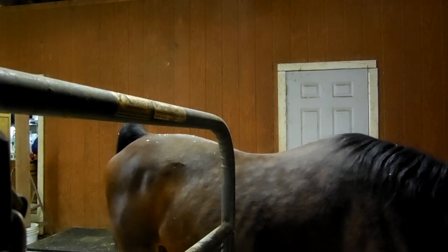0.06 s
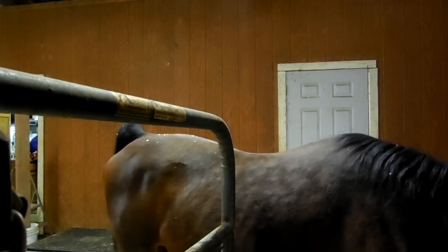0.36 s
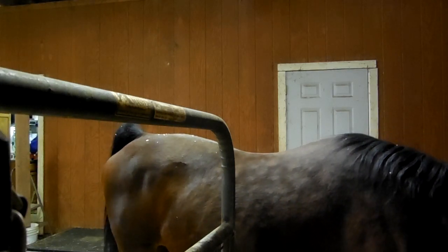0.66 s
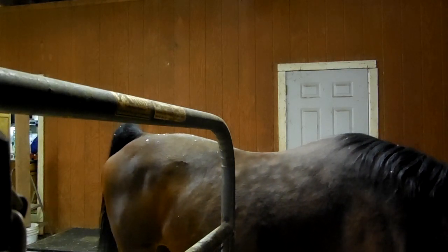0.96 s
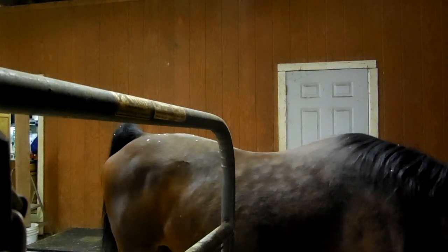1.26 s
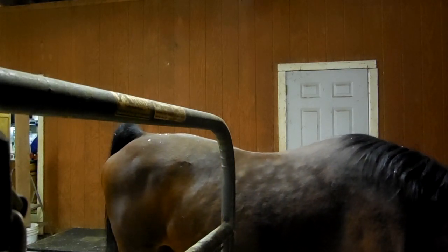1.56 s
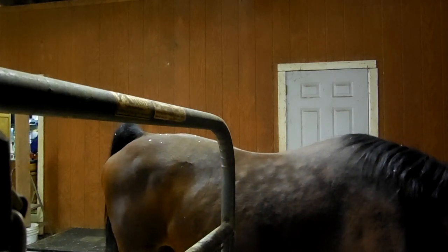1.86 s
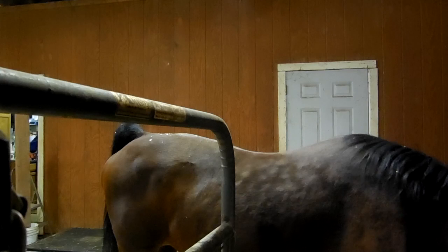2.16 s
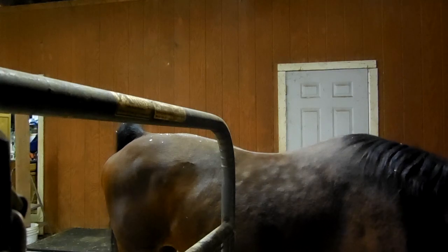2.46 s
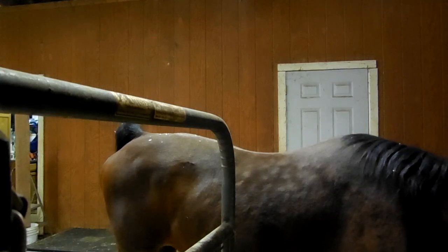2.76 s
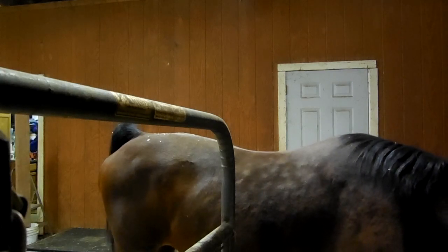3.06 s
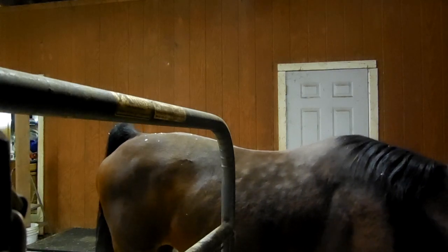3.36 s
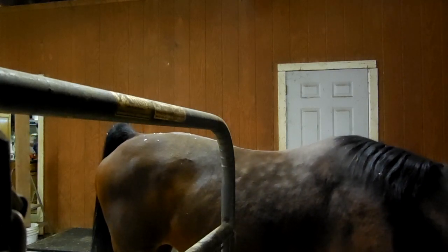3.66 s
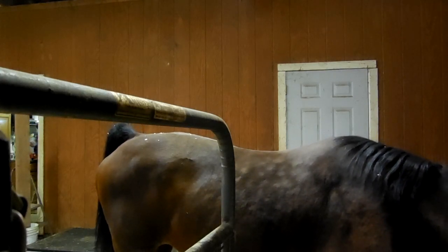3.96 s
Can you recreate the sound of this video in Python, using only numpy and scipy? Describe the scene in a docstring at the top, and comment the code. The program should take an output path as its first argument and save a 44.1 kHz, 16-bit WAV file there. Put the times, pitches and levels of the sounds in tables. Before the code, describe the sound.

Rain hisses steadily on a barn roof over humming fans and a few hoof knocks.

```python
"""In a wooden barn, rain hisses steadily on the roof while two electric motors, probably fans, hum.
Countless drop impacts merge into broadband noise. The two shafts turn at almost the same speed,
so their harmonics beat and the drone slowly swells and sinks. A horse shifts its weight: a few soft
hoof knocks excite the modes of the stall floor, scuffs add friction noise, and the walls reverberate."""
import sys
import numpy as np
from scipy import signal
from scipy.fft import rfft, irfft
from scipy.io import wavfile

SR = 44100
rng = np.random.default_rng(int(sys.argv[2]) if len(sys.argv) > 2 else 0)


def output_pcm(signal):
    """Save a mono or channel-first signal as 16-bit PCM at the path in sys.argv[1].

    Samples are clipped to [-1, 1] before scaling.
    """
    pcm = np.clip(np.atleast_2d(signal).T, -1, 1) * 32767
    wavfile.write(sys.argv[1], SR, np.round(pcm).astype(np.int16))


N = 176400
TIME = np.arange(N) / SR
BINS_HZ = np.maximum(np.arange(N // 2 + 1) * SR / N, 1)


def from_db(db):
    """Amplitude ratio: a factor of ten for every 20 dB."""
    return 10 ** (np.asarray(db) / 20)

def unit_rms(x):
    """Normalisation to unit mean power."""
    return x / np.sqrt(np.mean(x ** 2) + 1e-20)

def over_bins(points, column=1):
    """Interpolation of a table column along logarithmic frequency."""
    table = np.array(points)
    return np.interp(np.log(BINS_HZ), np.log(table[:, 0]), table[:, column])

def swell(curve):
    """Amplitude envelope: the gain of a level curve taken about its mean."""
    t, db = np.transpose(curve)
    return from_db(np.interp(TIME, t, db - db.mean()))

def waver(depth_db, rate_hz):
    """Random amplitude modulation: a gain whose level follows low-passed noise."""
    drift = irfft(rfft(rng.standard_normal(N)) / (1 + (BINS_HZ / rate_hz) ** 2), N)
    return from_db(depth_db * unit_rms(drift))

def decay(age, t60):
    """Exponential damping: 60 dB in t60 seconds."""
    return np.exp(-np.log(1000) * age / t60)

def stereo_spectra(pair):
    """Partial coherence: two independent signals give spectra alike in the bass, apart in the treble."""
    # likeness of left and right: f/Hz, correlation coefficient
    likeness = [(100, .998), (230, .995), (400, 0.75), (600, 0.9), (800, 0.75), (1100, 0.86), (2200, 0.68),
                (2800, 0.54), (4000, 0.091), (5400, -0.017), (6300, -0.34), (7200, 0.066), (10000, 0.089),
                (15000, 0.25)]
    correlation = over_bins(likeness)
    mid, side = rfft(pair)
    return np.sqrt(1 + correlation) * mid + np.sqrt(1 - correlation) * side * [[1], [-1]]

def draught():
    """Turbulence: a faint low rumble, independent on each side."""
    lowpass = signal.butter(3, 75, fs=SR, output="sos")
    return from_db(-70) * unit_rms(signal.sosfilt(lowpass, rng.standard_normal((2, N))))

def barn_reverb(source, t60=0.53, first_echo_s=0.0132, cutoff_hz=12000):
    """Reverberation: reflections from the wooden walls merge into a diffuse, decaying tail."""
    tail = rng.standard_normal((2, N)) * decay(TIME, t60) * (TIME > first_echo_s)
    response = irfft(stereo_spectra(tail) / np.sqrt(np.sum(tail ** 2)) / (1 + 1j * BINS_HZ / cutoff_hz), N)
    return signal.fftconvolve(source[None], response[:, :SR], axes=1)[:, :N]

def rain_hiss(drops_per_s=5000, drop_share=0.33, size_spread_db=3.5, ripple_db=1.2):
    """Shot noise: random drop impacts merge into a hiss that flutters band by band."""
    # spectrum of the rain: f/Hz, left relative level/dB, right relative level/dB
    colour = [(300, -25, -28), (1030, -15.5, -16.5), (1480, -13.5, -14), (2270, -13, -14),
              (3720, -10.5, -10.5), (5200, -11.5, -11), (6000, -9, -10), (6870, -10.5, -4.5),
              (7700, -10, -4), (8310, -10.5, -4), (9450, -7, -16.5), (10620, -11.5, -17.5),
              (12100, -18, -22), (13340, -18.5, -22.5), (13800, -26, -33), (16000, -33, -35)]
    # strength of the rain's treble: t/s, relative level/dB
    strength = [(0.0, -35.5), (0.01, -37.5), (0.26, -38), (0.36, -35), (0.73, -39.5), (0.82, -35.5),
                (0.99, -40), (1.0, -37.5), (2.43, -37.5), (2.46, -35), (2.84, -37.5), (3.33, -37),
                (3.61, -35), (3.7, -38.5), (3.89, -35), (4.0, -38)]
    sizes = from_db(size_spread_db * np.minimum(rng.exponential(1, (2, N)), 5))
    signs = rng.choice([-1, 1], (2, N))
    drops = unit_rms(sizes * signs * (rng.random((2, N)) < drops_per_s / SR))
    wash = np.sqrt(drop_share) * drops + np.sqrt(1 - drop_share) * rng.standard_normal((2, N))
    grid_hz = np.arange(0, SR / 2, 40)  # each side has its own finely uneven colour
    ripple = [np.interp(BINS_HZ, grid_hz, row) for row in rng.normal(0, ripple_db, (2, len(grid_hz)))]
    spectra = stereo_spectra(wash) * from_db(ripple) * from_db([over_bins(colour, 1), over_bins(colour, 2)])
    band = np.floor(2 * np.log2(np.maximum(BINS_HZ / 1100, 1)))  # half octaves above 1100 Hz
    hiss = unit_rms(sum(irfft(spectra * (band == k), N) * waver(depth_db=1.05, rate_hz=12.7)
                        for k in np.unique(band)))
    treble = irfft(rfft(hiss) / (1 + (3500 / BINS_HZ) ** 2), N)
    return from_db(-34.5) * (hiss - treble + swell(strength) * treble)

def rain_rings():
    """Resonance: narrow bands of noise ring at a few pitches within the hiss."""
    # peaks in the hiss: f/Hz, width/Hz, left level/dB, right level/dB
    peaks = [(2213, 80, -59, -59), (3990, 45, -59, -73), (6330, 79, -57, -51), (7650, 240, -51, -43.5),
             (7825, 70, -48, -49.5), (8670, 42, -56, -58)]
    # strength of the ringing: t/s, relative level/dB
    strength = [(0.0, -39), (0.22, -43.1), (0.3, -39.8), (0.74, -40), (0.84, -36), (1.08, -48), (1.16, -37),
                (1.46, -41.5), (2.0, -40), (2.32, -42), (2.6, -43), (2.94, -41), (3.18, -44), (3.24, -46),
                (3.62, -40), (3.72, -42.3), (3.84, -38.5), (4.0, -44)]
    rings = 0
    for hz, width, left_db, right_db in peaks:
        resonance = 1 / (1 + 2 * ((BINS_HZ - hz) / width) ** 2)
        noise = unit_rms(irfft(stereo_spectra(rng.standard_normal((2, N))) * resonance, N))
        rings += from_db([[left_db], [right_db]]) * noise * waver(depth_db=1, rate_hz=12.7)
    return swell(strength) * rings

def tone(hz, rms_db, crest_s):
    """Simple harmonic motion with a crest at crest_s."""
    return np.sqrt(2) * from_db(rms_db) * np.cos(2 * np.pi * hz * (TIME - crest_s))

def room_tone(hz, db):
    """Standing waves make a gently wavering tone differ a little between left and right."""
    side = tone(hz, db - 22, rng.random()) * [[1], [-1]]
    return (tone(hz, db, rng.random()) + side) * waver(depth_db=1, rate_hz=2)

def fans(shafts_hz=(54.24, 53.93), mains_hz=60, sideband_hz=54.1, pan_db=0.26):
    """Beats: the harmonics of two nearly equal shaft speeds interfere over magnetic hum and rushing air."""
    # shaft harmonics: multiple of the rotation frequency
    orders = (1, 2, 3, 4, 5, 6, 7, 8, 11, 13, 14)
    # strength of each harmonic: first fan level/dB, second fan level/dB
    order_levels = [(-23.5, -38), (-45, -50.5), (-61.5, -49.5), (-61.5, -51.5), (-60.5, -52.5),
                    (-53, -46.5), (-56, -56), (-59, -60), (-44.5, -50), (-56, -47.5), (-56, -76)]
    # magnetic hum and its sidebands: multiple of the mains, multiple of the sideband spacing added
    motor_tones = [(4, 0), (6, -1), (6, 0), (6, 1), (6, 2), (6, 3), (8, -1), (8, 0), (8, 1), (12, 1)]
    # strength of each magnetic tone: level/dB
    motor_levels = [-60.5, -49, -46, -43.5, -48, -55, -52, -49.5, -50, -56]
    # spectrum of the rushing air: f/Hz, relative level/dB
    air_colour = [(20, 0), (60, 1), (90, 2.5), (128, -2.5), (158, 5), (195, -1), (320, 1.5), (450, 2.5),
                  (580, 2), (680, 1.5), (770, -1), (900, -1), (1100, -17.5), (2000, -19), (5000, -39)]
    in_phase_s = {1: .75, 2: 2.9}  # when the beats of the two lowest harmonics are loudest
    hum = 0
    for order, levels in zip(orders, order_levels):
        for shaft_hz, db in zip(shafts_hz, levels):
            hz = order * shaft_hz
            hum = hum + (tone(hz, db, in_phase_s[order]) if order in in_phase_s else room_tone(hz, db))
    for (harmonic, sideband), db in zip(motor_tones, motor_levels):
        hum = hum + room_tone(harmonic * mains_hz + sideband * sideband_hz, db)
    air = irfft(stereo_spectra(rng.standard_normal((2, N))) * from_db(over_bins(air_colour)), N)
    return (hum + from_db(-43.5) * unit_rms(air)) * from_db([[pan_db], [-pan_db]])

def bandpass(x, hz, octaves):
    """Band limiting about a geometric centre frequency."""
    edges = [hz * 2 ** (-octaves / 2), hz * 2 ** (octaves / 2)]
    return signal.sosfilt(signal.butter(2, edges, "band", fs=SR, output="sos"), x)

def mode(age, hz, contact_s, t60):
    """A damped oscillator that builds up during the contact and then rings freely."""
    return np.minimum(age / contact_s, 1) * np.sin(2 * np.pi * hz * age) * decay(age, t60)

def hoof_scuffs():
    """Stick-slip friction: a dragging hoof makes gritty noise whose pitch may sink as it slows."""
    # hoof drags: t/s, rise/s, fade/s, centre f/Hz, glide/octaves, width/octaves, level/dB
    drags = [(.008, 0.026, 0.13, 780, 0, 1.4, -38), (0.189, .012, .15, 252, 0, .45, -36.5),
             (.196, 0.0072, .05, 2200, 0, .7, -42), (.198, .01, .07, 730, 0, 0.4, -40),
             (1.2, 0.027, .09, 2130, 0, .25, -46), (1.532, .003, 0.019, 3300, -.1, 0.38, -35),
             (1.548, 0.0036, .06, 3170, -.35, .42, -37.5), (1.525, 0.026, .19, 1070, 0, 1.1, -43.5),
             (1.602, .003, 0.026, 1900, 0, .35, -43), (2.363, .036, 0.2, 620, 0, 2.5, -44.5),
             (2.379, 0.044, .07, 190, 0, 1.4, -40), (2.498, .004, 0.109, 790, -.1, 1.05, -36),
             (2.499, .002, .026, 2120, -.1, .4, -39.5)]
    out, age = np.zeros(N), TIME[:SR // 2]
    for t, rise, fade, hz, glide, octaves, db in drags:
        envelope = np.interp(age, [0, rise, rise + fade], [0, 1, 0])
        slips = rng.standard_normal(len(age)) * waver(depth_db=1.5, rate_hz=210)[:len(age)]
        travel = np.cumsum(2 ** (glide * np.minimum(age / (rise + fade), 1))) / SR
        friction = np.interp(travel, age, bandpass(slips, hz, octaves))
        gain = from_db(db) * np.sqrt(np.mean(envelope ** 2))
        out[int(t * SR):int(t * SR) + len(age)] += gain * unit_rms(envelope * friction)
    return out

def floor_thuds():
    """Transient loading: the floor gives under the horse in a few cycles that rise slightly in pitch."""
    # weight coming down: t/s, duration/s, f/Hz, glide/octaves, peak level/dB
    loads = [(.183, .015, 690, 0.27, -19.5), (1.528, .03, 345, 0.031, -29), (1.586, 0.029, 362, 0, -29),
             (2.378, 0.088, 151.6, 0.039, -29)]
    out = np.zeros(N)
    for t, duration, hz, glide, db in loads:
        progress = np.clip((TIME - t) / duration, 0, 1)
        cycles = np.cumsum(hz * 2 ** (glide * (progress - .5)) * (progress > 0)) / SR
        out += from_db(db) * np.sin(np.pi * progress) ** 2 * np.sin(2 * np.pi * cycles)
    return out

def hoof_knocks():
    """Impact excitation: grit crunches, horn clicks, the floor rings; soft contact weakens high modes."""
    # hoof falls: t/s, floor level/dB, cutoff f/Hz, contact/s, floor pitch ratio, click f/Hz, click level/dB
    impacts = [(.1855, -13.5, 400, .002, 1.06, 1750, -38), (.2065, -28, 1200, .002, 1.05, 2100, -39),
               (.2175, -30, 900, 0.0023, 0.96, 1810, -35), (1.531, -33, 2000, 0.00098, 1.1, 1240, -31),
               (1.604, -25, 500, 0.0017, 0.92, 1455, -27.5), (1.63, -28, 1200, .002, 1.1, 1150, -40),
               (2.412, -30, 450, .004, 0.94, 1200, -60), (2.4715, -23.5, 600, 0.0016, 1.2, 1100, -40),
               (2.4993, -19, 1700, 0.0016, 1.08, 1300, -29), (2.518, -30, 900, .003, 0.94, 1560, -44),
               (2.528, -27, 1200, .003, 1.03, 1110, -40), (2.538, -35, 1400, .003, 1.14, 1410, -43)]
    # modes of the stall floor: f/Hz, relative level/dB, T60/s
    floor_modes = [(249, -10, 0.084), (345, -6.5, 0.07), (486, 0, 0.032), (669, 2.5, 0.033),
                   (752, -9.5, 0.041), (937, -17, 0.038), (1226, -12, 0.038)]
    out, age = np.zeros(N), TIME[:SR // 4]
    for t, floor_db, cutoff_hz, contact_s, ratio, click_hz, click_db in impacts:
        grit = unit_rms(bandpass(rng.standard_normal(len(age)), click_hz, octaves=2.2))
        crunch = from_db(-7) * grit * decay(age, t60=0.033)
        knock = from_db(click_db) * (crunch + mode(age, click_hz, contact_s, t60=0.031))
        for hz, mode_db, t60 in floor_modes:
            gain = from_db(floor_db + mode_db + rng.normal(0, 1)) / np.sqrt(1 + (hz / cutoff_hz) ** 4)
            knock += gain * mode(age, ratio * hz, contact_s, t60)
        out[int(t * SR):int(t * SR) + len(age)] += knock
    return out

def scene(right_lag_s=.00004):
    """Superposition: rain overhead, and the fans and nearby horse, which reach the left side first."""
    horse = hoof_knocks() + floor_thuds() + hoof_scuffs()
    left, right = fans() + horse + from_db(-6) * barn_reverb(horse)
    indoors = np.array([left, np.interp(TIME - right_lag_s, TIME, right)])
    return rain_hiss() + rain_rings() + draught() + indoors

def record(dry, left_highpass_hz=2.2, cutoff_hz=15800):
    """Finite bandwidth: the left microphone loses the deepest bass; both cut the top steeply."""
    highpass = signal.butter(1, left_highpass_hz, "high", fs=SR, output="sos")
    lowpass = signal.ellip(10, .1, 80, cutoff_hz, fs=SR, output="sos")
    return signal.sosfilt(lowpass, np.array([signal.sosfilt(highpass, dry[0]), dry[1]]))


dry = scene()
out = record(dry)
output_pcm(out)
```